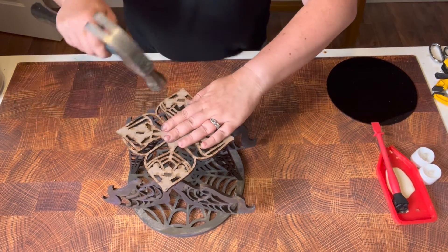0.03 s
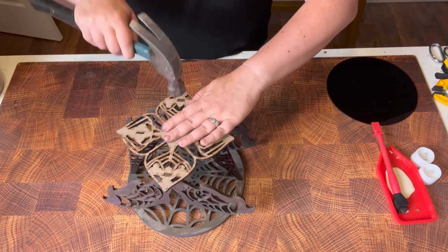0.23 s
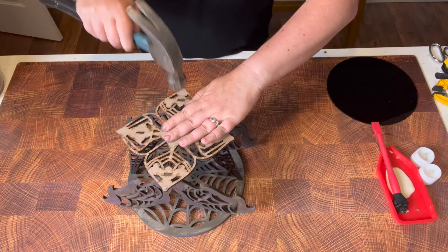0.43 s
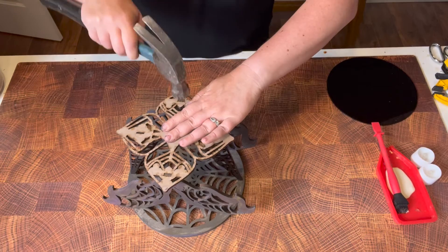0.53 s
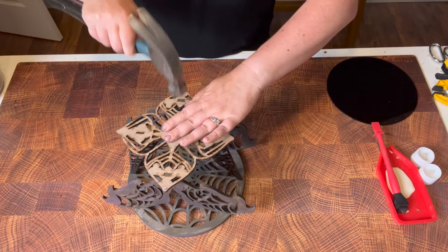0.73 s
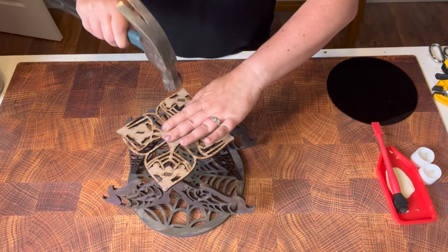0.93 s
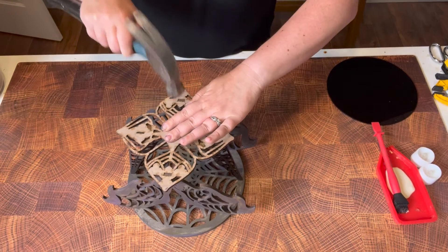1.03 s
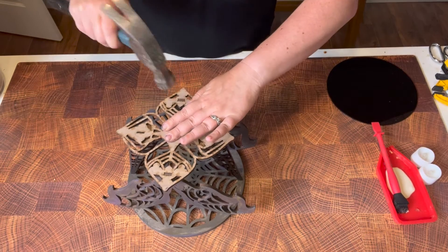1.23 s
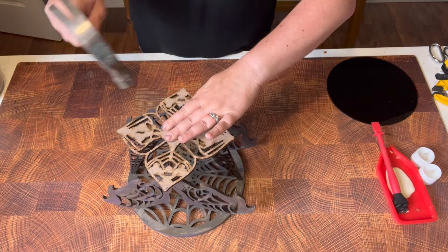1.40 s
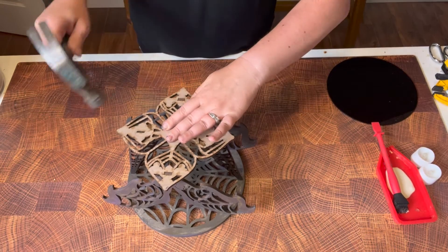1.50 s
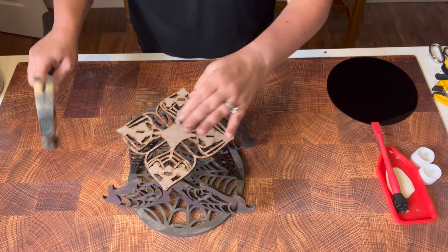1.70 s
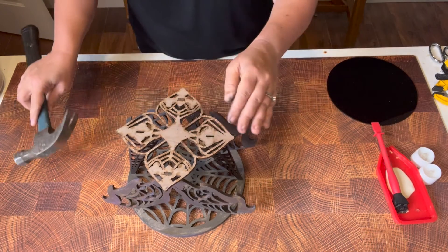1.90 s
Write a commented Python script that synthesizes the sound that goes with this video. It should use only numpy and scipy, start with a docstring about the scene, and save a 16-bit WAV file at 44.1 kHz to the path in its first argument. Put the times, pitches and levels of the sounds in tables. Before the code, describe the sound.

Four hard hammer knocks on thin slotted wood, about three per second, each with a woody clack, slight metallic ring and worktop thud, then a quiet low bump as something is set down. Small lively room, close stereo pickup.

```python
"""A quiet room: a steel hammer taps a thin wooden piece four times on a heavy worktop.
Each tap is a crack of noise, a clack of short modes, a metallic ring, a snap and a late thud of slow modes.
The room answers with fading random echoes; afterwards a small object knocks softly, over faint air noise and hum.
Two microphone ports a few centimetres apart hear it, with slightly different phase and level."""
import sys
import numpy as np
from scipy import signal
from scipy.fft import rfft, irfft, next_fast_len
from scipy.io import wavfile
from scipy.ndimage import uniform_filter1d

SR = 44100
rng = np.random.default_rng(int(sys.argv[2]) if len(sys.argv) > 2 else 0)


def wrap_up_sound(samples):
    """Save the sound to the file named by the first command line argument, as 16-bit audio."""
    columns = np.atleast_2d(samples).T
    # keep every value between -1 and 1, then stretch to whole-number steps
    tamed = np.clip(columns, -1, 1)
    steps = np.round(tamed * 32767).astype(np.int16)
    wavfile.write(sys.argv[1], SR, steps)


N = 85995  # length of the scene in samples


def amp(db):
    """Turn decibels into a plain multiplier."""
    return 10 ** (np.asarray(db) / 20)


def evened(x):
    """Scale a signal to an average (RMS) strength of one."""
    return x / np.sqrt(np.mean(x ** 2) + 1e-20)


def read(points, hz, axis=1):
    """Read one column of a table at any frequency, joining its points along a log scale."""
    p = np.asarray(points, float)
    return np.interp(np.log(hz + 1), np.log(p[:, 0] + 1), p[:, axis])


def add(mix, start_s, sound):
    """Mix a sound in at its start time, cutting off what runs past the end."""
    part = mix[round(start_s * SR):][:len(sound)]
    part += sound[:len(part)]


def swell(t, rise_s, t60_s):
    """Soft start, then a fade of 60 dB per t60; silent before zero."""
    t = np.maximum(t, 0)
    return (1 - np.exp(-(t / rise_s) ** 2)) * amp(-60 * t / t60_s)


def pair(frames, same, size):
    """Two random short-time spectra, left and right, as alike at each frequency as the table says."""
    hz = np.fft.rfftfreq(size, 1 / SR)
    a, b, c, d = rng.standard_normal((frames, len(hz), 4)).T
    left, other = a + 1j * b, c + 1j * d
    likeness = np.clip(read(same, hz), -1, 1)[:, None]
    right = likeness * left + np.sqrt(1 - likeness ** 2) * other
    return hz, np.array([left, right])


def ring(t, modes, chatter_s, detune):
    """A brief noisy chatter excites fading sine modes, each slightly detuned at random."""
    drive = rng.standard_normal(len(t)) * swell(t, chatter_s, 6 * chatter_s)
    shifts = 1 + detune * rng.standard_normal(len(modes))
    body = 0
    for (hz, db, t60_s), shift in zip(modes, shifts):
        body = body + amp(db - 60 * t / t60_s) * np.sin(2 * np.pi * hz * shift * t)
    return signal.fftconvolve(drive / np.linalg.norm(drive), body)[:len(t)]


def room_tone():
    """Faint steady air noise, plus a wavering low hum made of narrow bands of noise."""
    # colour of the air noise: (frequency [Hz], relative density [dB per Hz])
    air_colour = [(15, -45.5), (25, -15.5), (60, 2), (214, -15.5), (252, -9.5), (496, -20.5), (854, -19),
                  (1180, -33), (1600, -33), (3230, -33), (16500, -56)]
    # left-right likeness of the air noise: (frequency [Hz], likeness [0 to 1])
    air_same = [(60, 0.99), (180, 0.27), (500, 0.089), (16000, .1)]
    # narrow bands of the hum: (centre [Hz], relative level [dB], width [Hz])
    hum_bands = [(55, -4, 25), (97, 0, 18), (183, -7, 16)]
    # rise and fall of the hum: (time [s], level [dB])
    hum_level = [(0, -76), (.25, -103), (0.501, -72), (1.402, -58), (1.7, -56), (1.82, -58), (1.95, -67)]
    air_db = -65.5

    hz, z = pair(N // 256 + 5, air_same, size=1024)
    coloured = z * amp(read(air_colour, hz))[:, None]
    hiss = signal.istft(coloured, nperseg=1024, noverlap=768)[1][:, :N]
    air = amp(air_db) * evened(hiss)

    f, noise = np.fft.rfftfreq(N, 1 / SR), rfft(rng.standard_normal(N))
    hum = 0
    for centre, db, width in hum_bands:
        band = irfft(noise / (1 + (2 * (f - centre) / width) ** 4), N)
        hum = hum + amp(db) * evened(band)
    return air + hum * amp(np.interp(np.arange(N) / SR, *np.transpose(hum_level)))


def room(level_db, tilt_db):
    """Dense uneven echoes of one blow, each band with its own strength and decay, and a fainter long tail."""
    # answer of the room: (frequency [Hz], level [dB], t60 [s])
    answer = [(60, -26, 0.79), (148, -13, 0.77), (300, -5.5, 0.21), (450, -8, 0.36), (800, -13, 0.45),
              (1475, -14, 0.45), (1900, -14.5, 0.39), (2250, -8.5, 0.34), (2970, -19.5, 0.39),
              (4000, -23.5, 0.36), (6300, -25.5, 0.38), (9500, -31.5, 0.27), (11000, -37, 0.52),
              (13000, -43.5, 0.34), (15000, -44.5, .3), (16500, -58.5, .3)]
    # left-right likeness of the echoes: (frequency [Hz], likeness [0 to 1])
    echo_same = [(100, .99), (300, .92), (700, .5), (1300, .6), (2400, .7), (4400, .8), (8000, .93),
                 (15000, .93)]
    # resonances heard in the tail: (centre [Hz], width [Hz], boost [dB])
    resonances = [(395, 90, 6), (550, 60, 4.5), (1980, 60, 2.5), (2367, 37, 1.5), (2600, 70, 1.5)]
    rise_s, late_db, late_stretch = .0099, -22, 2.3
    patchy_db, flicker_db = .71, .68
    frames, size, hop = 700, 256, 64

    hz, z = pair(frames, echo_same, size)
    t, t60_s = np.arange(frames) * hop / SR, read(answer, hz, axis=2)[:, None]
    early_power = amp(-120 * t / t60_s)
    late_power = amp(2 * late_db - 120 * t / (late_stretch * t60_s))
    fall = np.sqrt(early_power + late_power)

    # patches vary over time and pitch; flicker moves all pitches together
    chance = rng.standard_normal((frames, len(hz)))
    smooth = uniform_filter1d(uniform_filter1d(chance, size=14, axis=0), size=3, axis=1)
    patches = evened(smooth).T
    flicker = evened(uniform_filter1d(chance[:, 0], size=4))
    uneven = amp(patchy_db * patches + flicker_db * flicker)
    both = np.array([z, z * fall * uneven])
    plain, tail = signal.istft(both, nperseg=size, noverlap=size - hop)[1]

    f = np.fft.rfftfreq(tail.shape[1], 1 / SR)
    boost_db = sum(db / (1 + (2 * (f - c) / width) ** 2) for c, width, db in resonances)
    slope_db = tilt_db * np.log2(np.maximum(f, 500) / 2000)
    tail = irfft(rfft(tail) * amp(level_db + read(answer, f) + boost_db + slope_db), tail.shape[1])
    u = np.arange(tail.shape[1]) / SR
    # the unfaded plain noise sets the reference level; the echoes stop at 0.95 s
    return tail / plain.std() * (1 - np.exp(-(u / rise_s) ** 2)) * (u < .95)


def knock(t):
    """A soft low note from something set down: fading sine modes with a gentle start."""
    # modes of the knock: (frequency [Hz], level [dB], t60 [s])
    modes = [(254.3, 5.5, 0.24), (276.3, -2.5, 0.27), (706, -5.5, 0.082), (2700, -32, .3), (4740, -23, .1),
             (5140, -30, .1)]
    rise_s = .006
    return sum(amp(db) * swell(t, rise_s, t60_s) * np.sin(2 * np.pi * hz * t) for hz, db, t60_s in modes)


def thud(t):
    """The worktop swells slowly into ringing; low modes arrive last."""
    # worktop modes: (frequency [Hz], level [dB], t60 [s], direction of the first swing [+1 or -1])
    modes = [(73.2, -9.3, .49, 1), (96.3, -15.4, .46, -1), (113, -2.4, .19, -1), (120.1, -9.6, .43, 1),
             (128.1, -18.8, .42, 1), (172.7, -9.1, .28, -1), (183.1, 5, .138, -1), (198.7, -10.4, .227, -1),
             (206.7, -3, .086, -1), (239.3, -2.4, .148, 1), (255.9, -19.5, .5, 1), (302.5, -14.9, .3, -1),
             (397.7, -25, .5, -1), (42, -24, .4, 1)]
    travel_s, rise_s = .00083, .010  # travel time is for 200 Hz
    total = 0
    for hz, db, t60_s, way in modes:
        u = t - travel_s * np.sqrt(200 / hz)
        total = total + way * amp(db) * swell(u, rise_s, t60_s) * np.sin(2 * np.pi * hz * u)
    return total


def hammer_ring(t):
    """A longer ring, likely the hammer, started by a very short chatter."""
    # ringing modes: (frequency [Hz], level [dB], t60 [s])
    modes = [(2260, -3.5, .2), (2366, -3, 0.37), (2410, -5.5, .3), (2410, -3.5, 0.29), (2620, -3.5, 0.29)]
    return ring(t, modes, chatter_s=.00165, detune=.0022)


def clack(t):
    """The thin piece chatters briefly in its slots, which sets off its own short modes."""
    # modes of the thin piece: (frequency [Hz], level [dB], t60 [s])
    modes = [(597, -4, 0.047), (1243, -2.5, 0.018), (1642, 0, .03), (2056, -3, 0.1), (2376, -7, 0.18),
             (2713, -9, 0.09), (3410, -13, 0.067), (6270, -7, 0.042)]
    return ring(t, modes, chatter_s=.0033, detune=.022)


def tick(t):
    """A very short bright snap of band-limited noise."""
    # edges of the noise band: (low [Hz], high [Hz])
    edges = [3500, 12000]
    rise_s, t60_s = .001, .009
    band = signal.butter(1, edges, "band", fs=SR, output="sos")
    hiss = signal.sosfilt(band, rng.standard_normal(len(t)))
    return 2 * hiss * swell(t, rise_s, t60_s)


def crack(t, tilt_db, body_db=0):
    """A burst of noise in bands, each with its own rise and fade; most treble comes and goes quickest."""
    # crack by band: (centre [Hz], relative level [dB], rise [s], t60 [s])
    bands = [(378, 0.5, 0.0069, .05), (756, 1, 0.0059, 0.029), (1200, 4.5, 0.0059, 0.059),
             (2000, 4, .003, 0.043), (3000, -6.5, 0.0037, 0.056), (4440, -2, 0.0013, 0.038),
             (5840, 1, 0.00065, 0.016), (8750, -2, .001, .02), (11500, -2.5, 0.003, 0.018),
             (14200, -18.5, 0.0015, 0.007), (16500, -16.5, .001, 0.011)]
    body_hz = 1000  # the extra body goes to bands below this
    z, hz = rfft(rng.standard_normal(len(t))), np.fft.rfftfreq(len(t), 1 / SR)
    centres = np.log([row[0] for row in bands])
    total = 0
    for one, (f, db, rise_s, t60_s) in zip(np.eye(len(bands)), bands):
        share = np.interp(np.log(hz + 1), centres, one, 0)  # neighbouring bands overlap
        noise = evened(irfft(z * np.sqrt(share), len(t)))
        level_db = db + tilt_db * np.log2(f / 2000) + body_db * (f < body_hz)
        total = total + amp(level_db) * swell(t, rise_s, t60_s) * noise
    return total / 2


def scene():
    """Place the four taps, the soft knocks and their echoes over the room tone."""
    # start of each tap: (time [s])
    tap_times = [.2395, .5284, .8131, 1.1075]
    # strength of each tap: (thud [dB], tick [dB], crack [dB], clack [dB], hammer ring [dB], room [dB],
    # brightness [dB per octave], extra body of the crack [dB])
    taps = [(-8, -16, -16.5, -27, -31, -1.5, -0.57, 8), (-6, -20, -9.5, -16.5, -29.5, 1.93, -1.3, 0.6),
            (-6, -21.5, -10.5, -20, -30, 3.93, -0.44, 3), (-5.5, -11, -9.5, -17.5, -34, 3.75, -0.35, 0.9)]
    # soft knocks: (time [s], crack-like tick [dB], low note [dB])
    knocks = [(1.407, -63, -77), (1.505, -73, -74), (1.602, -60, -63), (1.6088, -51.5, -48),
              (1.670, -85, -52.5), (1.7744, -74, -69.5)]
    scatter_db, knock_room_db = -10, 11.5

    t, t_long = np.arange(SR // 2) / SR, np.arange(SR) / SR
    near, far = np.zeros(N), np.zeros((N, 2))  # near is the same at both ports
    for s, levels in zip(tap_times, taps):
        thud_db, tick_db, crack_db, clack_db, ring_db, room_db, tilt_db, body_db = levels
        add(near, s, amp(thud_db) * thud(t_long))
        add(near, s, amp(tick_db) * tick(t))
        add(near, s, amp(crack_db) * crack(t, tilt_db, body_db))
        add(near, s, amp(clack_db) * clack(t))
        add(near, s, amp(ring_db) * hammer_ring(t))
        # a fainter, separate crack swings opposite ways at the two ports
        scatter = amp(crack_db + scatter_db) * crack(t, tilt_db, body_db)
        add(far, s, scatter[:, None] * [1, -1])
        add(far, s, room(room_db, tilt_db).T)
    for s, tick_db, note_db in knocks:
        add(near, s, amp(tick_db) * crack(t, 0) + amp(note_db) * knock(t))
        add(far, s, room(tick_db + knock_room_db, 0).T)
    return near + far.T + room_tone()


def record(dry):
    """The two ports differ in phase and level; loud peaks are rounded; then the top treble is cut."""
    # how far the first port leads the second: (frequency [Hz], phase [radians])
    lead_table = [(0, 0), (430, .1), (690, -.6), (1890, .1), (4740, .4), (5250, 1), (6200, 1.3),
                  (8350, 3.1), (10200, 3.3), (11500, 4.6), (12400, 6.1), (16500, 6.6)]
    # how much louder the first port is: (frequency [Hz], level difference [dB])
    louder = [(60, 0), (110, .4), (200, 1), (380, 2.5), (700, 2.8), (1290, 2.2), (2380, .5), (4400, -.2),
              (15000, .2)]
    edge_hz = 16900
    size = next_fast_len(N + 999)
    hz = np.fft.rfftfreq(size, 1 / SR)
    side = np.array([[.5], [-.5]])  # each port takes half of the difference
    lead = np.interp(hz, *np.transpose(lead_table))
    response = np.exp(1j * side * lead) * amp(side * read(louder, hz))
    ports = irfft(rfft(dry, size) * response, size)[:, :N]
    soft = 1.2 * np.tanh(ports / 1.2)
    lowpass = signal.firwin(511, edge_hz, window=("kaiser", 9), fs=SR)
    return signal.oaconvolve(soft, lowpass[None], "same")


dry = scene()
out = record(dry)
wrap_up_sound(out)
```